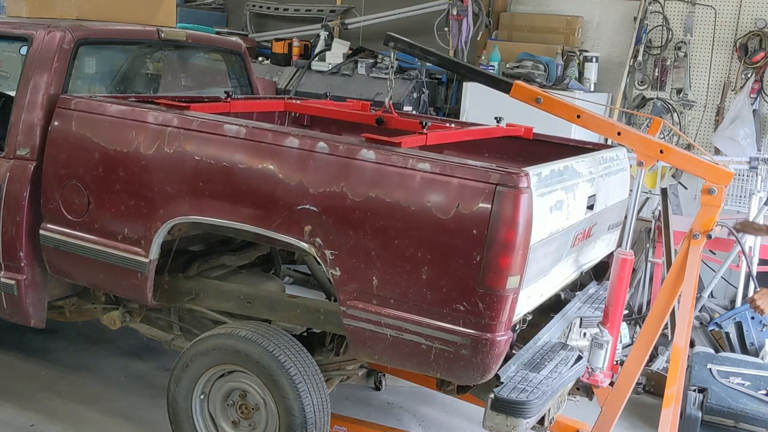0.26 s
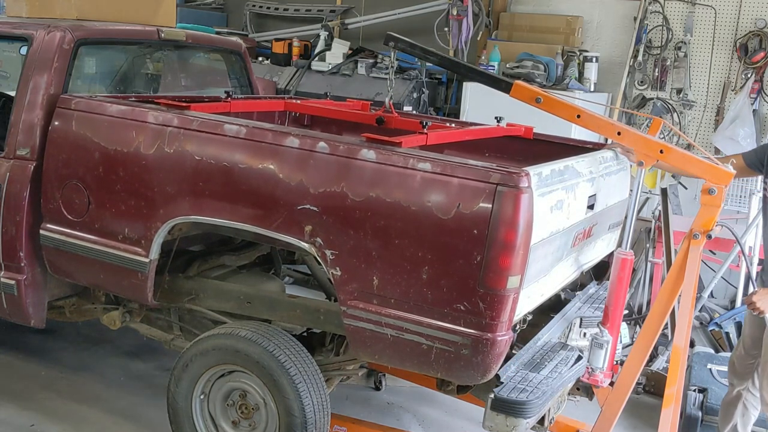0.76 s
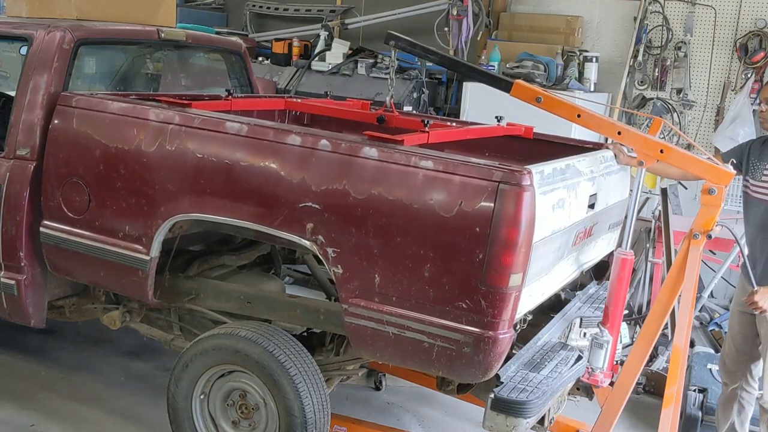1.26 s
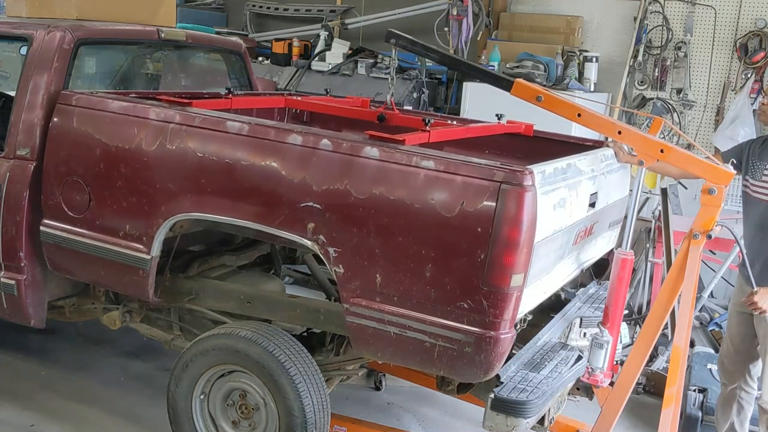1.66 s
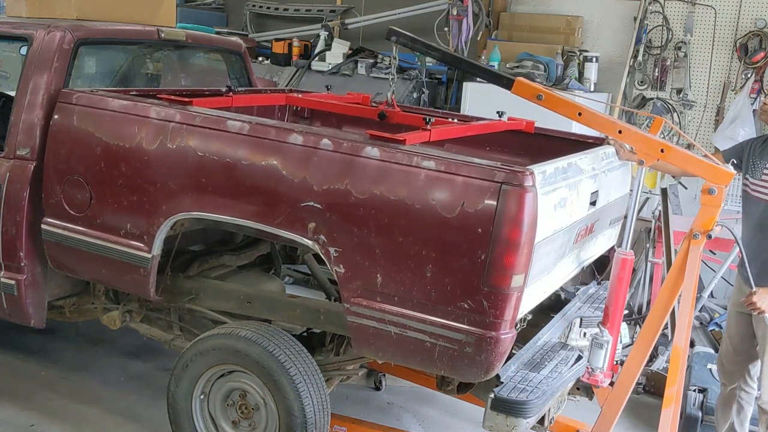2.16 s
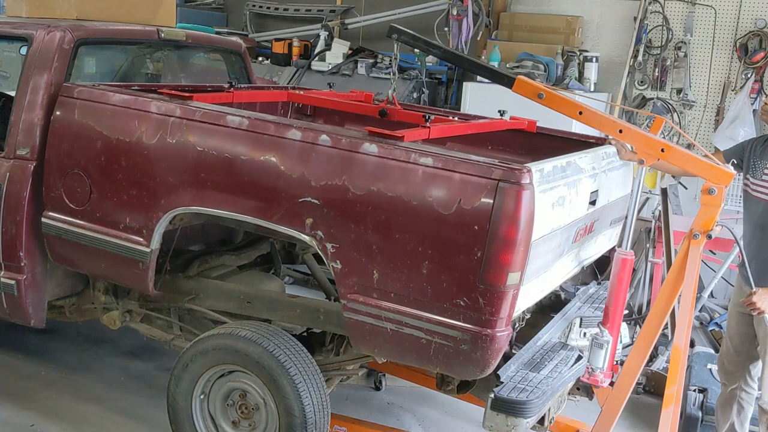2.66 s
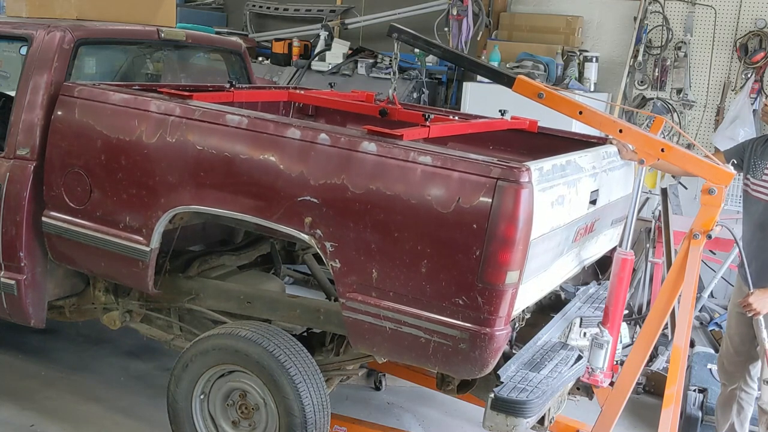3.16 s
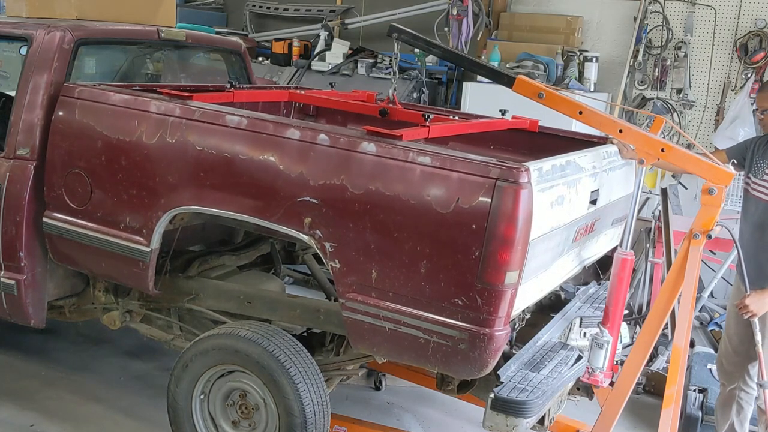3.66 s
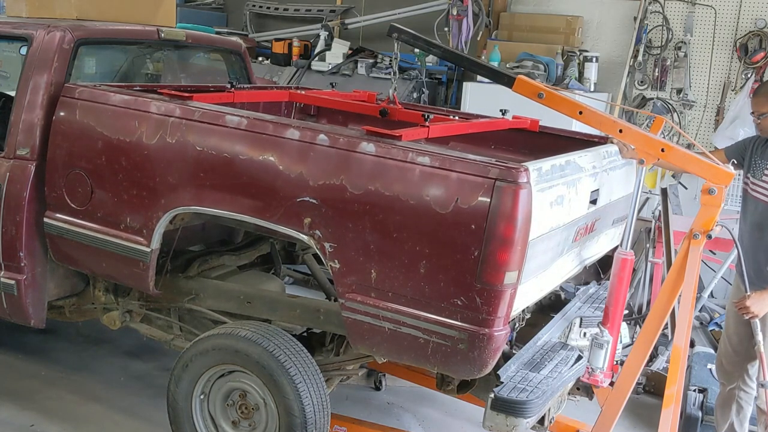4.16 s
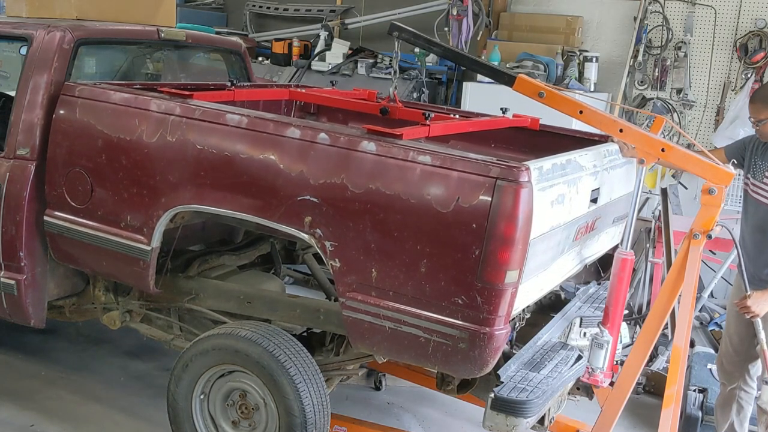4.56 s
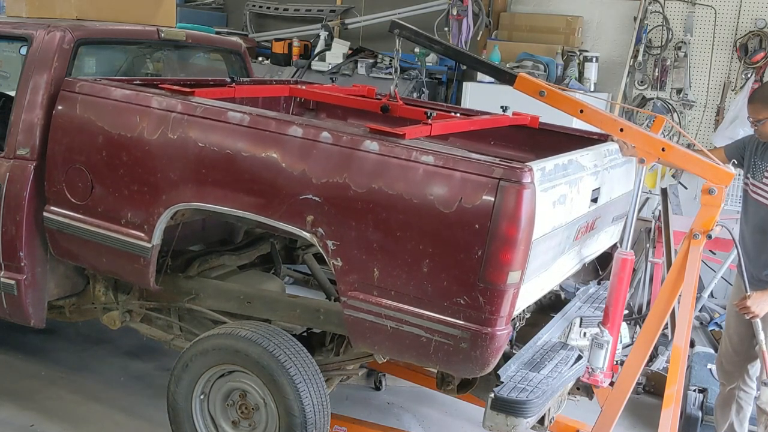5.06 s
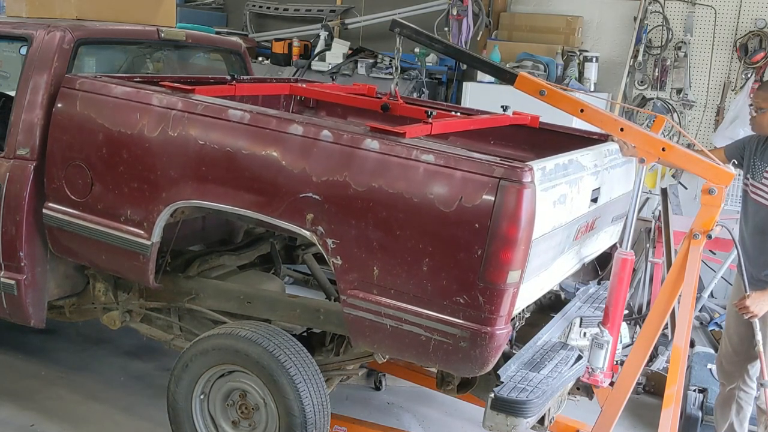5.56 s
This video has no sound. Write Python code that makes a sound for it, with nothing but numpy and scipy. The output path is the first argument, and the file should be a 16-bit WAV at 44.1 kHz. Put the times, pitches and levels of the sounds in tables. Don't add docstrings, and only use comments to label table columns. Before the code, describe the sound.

A garage with a low rumble and a steady, distant compressor hum. Slightly right, an air-driven pump on a hoist opens with a hiss and single strokes at 0.03 and 0.34 s. Each stroke is a harsh, bright spit of air with ringing pump metal and a low frame thump, followed about 28 ms later by a hard, hollow piston knock. After a short rest and rising valve hiss, strokes return at 1.0 and 1.25 s, quickening to a steady eight or so per second until 2.85 s. Reverberation dies away; the frame hums faintly, with tiny leaks and a bright lever click near 3.28 s. A dull, hollow thud sounds across the garage at 3.75 s. A short hiss swells at 4.36 s, then a second rapid run of nine strokes goes from 4.44 to 5.47 s, slowing at the end, leaving echoes, faint settling tones and hum.

```python
import sys
import numpy as np
from scipy import signal
from scipy.fft import rfft, irfft
from scipy.io import wavfile
from scipy.ndimage import uniform_filter1d

SR = 44100
rng = np.random.default_rng(int(sys.argv[2]) if len(sys.argv) > 2 else 0)


def gain_from_db(level_db):
    decades = np.asarray(level_db, float) / 20
    return 10 ** decades


def master_out(mix):
    frames = np.transpose(np.atleast_2d(mix))
    ceiling = np.clip(frames, -1, 1)
    pcm = np.round(ceiling * 32767).astype(np.int16)
    wavfile.write(sys.argv[1], SR, pcm)


N = 255780


def evened(x):
    return x / np.sqrt(np.mean(x ** 2) + 1e-20)


def read(points, hz):
    f, value = np.transpose(points)
    return np.interp(np.log(hz + 1), np.log(f + 1), value)


def coloured(points, shape):
    hz = np.fft.rfftfreq(shape[-1], 1 / SR)
    spectrum = rfft(rng.standard_normal(shape)) * gain_from_db(read(points, hz))
    return evened(irfft(spectrum, shape[-1]))


def clicks(s, db):
    train = np.zeros(N)
    at = np.clip(np.round(s * SR).astype(int), 0, N - 1)
    train[at] = gain_from_db(db)
    return train


def ring(modes, rise_s):
    t = np.arange(SR // 2) / SR
    sines = sum(gain_from_db(db - 60 * t / t60) * np.sin(2 * np.pi * hz * t) for hz, db, t60 in modes)
    return sines * (1 - np.exp(-t / rise_s))


# frequency in Hz, level in dB.
FLOOR = [(18, -53.5), (35, -22.5), (95, -6.5), (145, -10), (210, -27), (260, -32.5), (380, -38.5),
         (650, -44), (1400, -41), (3800, -52), (8000, -57.5), (16000, -54.5)]
FLOOR_DB = -41.5
# frequency in Hz, likeness from -1 to 1.
FLOOR_SAME = [(60, 1), (180, 0.83), (550, 0.77), (1650, 0.085), (4970, 0.28), (15000, -0.27)]
# frequency in Hz, width in Hz, level in dB.
HUM = [(54, 3, -60), (84, 6, -52), (143, 5.4, -48.5), (203.9, 3, -61.5), (7630, 450, -72),
       (13670, 200, -76.5)]


def background():
    hz = np.fft.rfftfreq(N, 1 / SR)
    power = gain_from_db(read(FLOOR, hz)) ** 2
    power *= gain_from_db(FLOOR_DB) ** 2 / power.sum()
    for line_hz, width_hz, db in HUM:
        bump = np.exp(-((hz - line_hz) / width_hz) ** 2)
        power = power + gain_from_db(db) ** 2 * bump / bump.sum()
    same = np.clip(read(FLOOR_SAME, hz), -1, 1)
    a, b = rfft(rng.standard_normal((2, N)))
    left_right = np.array([a, same * a + np.sqrt(1 - same ** 2) * b])
    return irfft(np.sqrt(power * N / 2) * left_right, N)


# frequency in Hz, level in dB rms.
MOTOR = [(53, -50.5), (102, -46), (203.5, -54)]


def motor():
    t = np.arange(N) / SR
    knots = np.linspace(0, t[-1], 40)
    hum = 0
    for hz, db in MOTOR:
        level_drift, phase_drift = [np.interp(t, knots, d) for d in rng.standard_normal((2, 40))]
        tone = np.sin(2 * np.pi * hz * t + .6 * phase_drift)
        hum = hum + np.sqrt(2) * gain_from_db(db + 1.5 * level_drift) * tone
    return hum


# start in seconds, end in seconds, final level in dB.
CREEPS = [
    (0.873, 1.012, -40.5),
    (1.13, 1.255, -34.5),
    (4.358, 4.434, -32),
    (5.74, 5.804, -61),
]
SWELL_DB_PER_S, CREEP_RUSH_DB = 106.5, -7
# start in seconds, level in dB, seconds to fade by 60 dB, lower rush in dB relative to the hiss.
PUFFS = [
    (0.0, -25.5, 0.1, 2.5),
    (.2, -51, 0.52, 0),
    (.284, -48, .3, 1),
    (.5, -65, 1.7, 14),
    (.608, -55.5, 0.44, 8.5),
    (3.1, -63.5, 1.8, 8),
    (3.224, -64, 0.28, -3),
    (5.62, -61.5, .4, 18),
]
# frequency in Hz, level in dB.
LEAK_COLOUR = [(2000, -25), (4000, -2), (5500, -1), (8000, -8.5), (12500, -0.5), (14000, -3), (16000, -13)]
# frequency in Hz, level in dB.
RUSH_COLOUR = [(200, -28), (400, -2), (670, -1), (860, -18), (1070, -5.5), (1400, -10), (2000, -8),
               (2700, -12.5), (4200, -16.5), (6000, -26)]


def leak():
    t = np.arange(N) / SR
    hiss, rush = np.zeros((2, N))
    for start, end, db in CREEPS:
        swell = gain_from_db(db - SWELL_DB_PER_S * abs(end - t)) * (t >= start) * (t < end)
        hiss += swell
        rush += swell * gain_from_db(CREEP_RUSH_DB)
    for start, db, t60, rush_db in PUFFS:
        puff = gain_from_db(db - 60 * abs(t - start) / t60) * (t >= start)
        hiss += puff
        rush += puff * gain_from_db(rush_db)
    hiss, rush = uniform_filter1d(np.array([hiss, rush]), 300)
    return hiss * coloured(LEAK_COLOUR, (N,)) + rush * coloured(RUSH_COLOUR, (N,))


# start in seconds, delay of the knock in ms, heave of the frame in dB.
STROKES = [(0.0332, 26.7, -2), (0.3408, 24.4, -4), (1.0222, 27.8, 2), (1.2542, 28.6, -.5),
           (1.4147, 28.0, -.5), (1.5437, 29.8, 0), (1.6615, 29.3, 3), (1.7789, 29.1, 1.5),
           (1.8963, 29.6, 3.5), (2.0152, 28.8, 2.5), (2.1332, 29.1, 2), (2.2526, 28.3, -2),
           (2.3719, 28.1, 2), (2.4903, 28.2, -.5), (2.6092, 27.9, -1.5), (2.7258, 29.2, 1),
           (2.8446, 28.7, .5), (4.4422, 29.1, 1.5), (4.5562, 29.0, 1), (4.6694, 29.2, 1), (4.7847, 28.8, 2),
           (4.9, 29.6, 1.5), (5.0178, 28.5, 3.5), (5.1413, 27.6, 1.5), (5.297, 26.7, .5),
           (5.4728, 26.9, -2.5)]
BLAST_DB, RESTED_DB, REFILL_S, CARRY = -17, 2.5, 2.16, 0.89


def blast_db():
    s = np.transpose(STROKES)[0]
    refill = 1 - np.exp(-np.diff(s, prepend=s[0]) / REFILL_S)
    return BLAST_DB + RESTED_DB * signal.lfilter([1], [1, -CARRY], refill)


# frequency in Hz, level in dB.
BLAST = [(150, -19), (400, -0.5), (900, -21.5), (1080, 0.5), (1450, -4), (1760, -4), (2150, -8.5),
         (2450, -6), (3200, -7), (4400, -3), (6200, -4), (7400, -7), (12000, -4.5), (15600, -7),
         (16500, -48)]
SNAP_S = .0022
EASE_S, HURRIED_GAP_S = 0.0047, .14


def blast():
    s, db = np.transpose(STROKES)[0], blast_db()
    hurried = np.diff(s, prepend=-1) < HURRIED_GAP_S
    lead_s = .02
    t = np.arange(SR // 4) / SR - lead_s
    spit = gain_from_db(11.5) * np.exp(-((t - .003) / .003) ** 2)
    jet = np.exp(-(np.maximum(t, 0) / 0.032) ** 11.0)
    flow = 0
    for some, open_s, spit_db in (hurried, EASE_S, -1.5), (~hurried, SNAP_S, -.2):
        opening = 1 / (1 + np.exp(-(t - .001) / open_s))
        puff = (gain_from_db(spit_db) * spit + jet) * opening
        flow = flow + signal.oaconvolve(clicks(s[some] - lead_s, db[some] - 1), puff)[:N]
    flutter = gain_from_db(2.0 * evened(uniform_filter1d(rng.standard_normal(N), 60)))
    return flow * flutter * coloured(BLAST, (N,))


# frequency in Hz, level in dB, seconds to fade by 60 dB.
BODY = [(715, -35, 0.48), (1066, -36.5, 0.16), (1063, -27, 0.16), (1149, -33, 0.43), (1196, -37.5, 0.46),
        (1353, -32, 0.13), (1466, -23.5, 0.055), (1570, -45.5, 0.092), (1711, -24, 0.067),
        (1730, -23.5, 0.12), (1867, -37, 0.076), (2268, -36.5, 0.3), (2375, -33.5, 0.2), (2624, -32, 0.3)]


def body():
    s, db = np.transpose(STROKES)[0], blast_db()
    rung = 0
    for mode in BODY:
        late, louder = rng.standard_normal((2, len(s)))
        blows = clicks(s + 0.00297 + .0006 * late, db + 21.0 + 2.4 * louder)
        rung = rung + signal.oaconvolve(blows, ring([mode], 0.00067))[:N]
    return rung


LAND_DB, USUAL_LAG_MS, LAND_DB_PER_MS = -1.04, 28.6, -0.4


def landing_db():
    return LAND_DB + LAND_DB_PER_MS * (np.transpose(STROKES)[1] - USUAL_LAG_MS)


# frequency in Hz, level in dB, seconds to fade by 60 dB.
THUMP = [(83.6, -15, .22)]
# frequency in Hz, level in dB, seconds to fade by 60 dB.
SWING = [(56, -25.5, .27), (64.6, -24.5, .4)]
# frequency in Hz, level in dB, seconds to fade by 60 dB.
BOUNCE = [(135, -19.5, .33), (159, -24.5, .16)]
# frequency in Hz, level in dB.
BOOM = [(40, -37.5), (65, -13), (82, 2), (100, -4.5), (136, -4.5), (165, -0.5), (200, -34)]


def thump():
    (s, lag_ms, db), knock_db = np.transpose(STROKES), landing_db()
    heave_s, ahead_s, rise_s = .003, .0058, .0008
    heave = signal.oaconvolve(clicks(s + heave_s, db), ring(THUMP, rise_s) - ring(SWING, rise_s))
    spring = signal.oaconvolve(clicks(s + lag_ms / 1000 - ahead_s, knock_db), ring(BOUNCE, rise_s))
    t = np.arange(SR // 2) / SR
    linger = gain_from_db(-17 - 60 * t / 0.45) * (1 - np.exp(-(t / 0.054) ** 2))
    power = signal.oaconvolve(clicks(s, db) ** 2, linger ** 2)[:N]
    return (heave + spring)[:N] + np.sqrt(abs(power)) * coloured(BOOM, (N,))


# frequency in Hz, level in dB, seconds to fade by 60 dB.
FRAME = [(203.8, -40.5, 0.69), (239, -30, 0.3), (269.5, -27.5, 0.32), (314.7, -29, 0.3), (356.3, -28, 0.16),
         (447.3, -38, 0.7), (490.5, -31, 0.37), (554, -38.5, 0.68), (637, -55.5, 1.37), (683, -38, 0.72),
         (767, -36, 0.56), (895, -86.5, 0.21)]
# delay in ms, share of the knock.
ECHOES = [(5.7, 0.36), (10.5, 0.62), (18.5, 0.43), (22.4, 0.1), (28, 0.18), (38, 0.15), (47.5, 0.062),
          (52.3, 0.23), (59.3, 0.29)]
KNOCK_HZ, KNOCK_DB, KNOCK_MS = 565, -13, 1.75


def knock():
    (s, lag_ms, _), db = np.transpose(STROKES), landing_db()
    ms = np.arange(SR // 2) * 1000 / SR
    bursts = 0
    for delay_ms, share in [(0.014, 0.94)] + ECHOES:
        u = ms - delay_ms - 2
        cycles = np.cos(2 * np.pi * KNOCK_HZ * u / 1000) * np.exp(-(u / KNOCK_MS) ** 2 / 2)
        bursts = bursts - share * cycles
    blow = gain_from_db(KNOCK_DB) * bursts + ring(FRAME, 0.0016)
    return signal.oaconvolve(clicks(s + lag_ms / 1000, db), blow)[:N]


# start in seconds, frequency in Hz, level in dB, length in seconds.
SETTLING = [(.48, 711, -55, 0.24), (.55, 80, -42, .46), (4.16, 84, -40, .27), (2.963, 328, -48.5, 0.23),
            (3.013, 100, -21, 0.036), (3.05, 895, -66, 0.24), (3.06, 634, -53, 0.17),
            (3.11, 484, -57, 0.15), (3.25, 640, -65, 0.24), (3.512, 327, -57.5, 0.28),
            (3.852, 275.4, -49.5, 0.14), (5.6, 690, -51, 0.18)]


def settling():
    t = np.arange(N) / SR
    tones = 0
    for s, hz, db, length_s in SETTLING:
        swell = np.sin(np.pi * np.clip((t - s) / length_s, 0, 1)) ** 0.51
        tones = tones + gain_from_db(db) * np.sin(2 * np.pi * hz * t) * swell
    return tones


# time in seconds, level in dB.
TICKS = [
    (.612, -47),
    (3.182, -59),
    (3.226, -52),
    (3.274, -44),
    (3.279, -31),
]


def ticks():
    s, db = np.transpose(TICKS)
    fade = np.exp(-np.arange(400) / SR / 0.0017)
    bright = evened(np.gradient(coloured(LEAK_COLOUR, (N,))))
    return signal.oaconvolve(clicks(s, db), fade)[:N] * bright


# start in seconds, level in dB, length in seconds.
THUD = (3.746, -34, 0.0072)
# frequency in Hz, level in dB.
THUD_COLOUR = [(120, -31.5), (200, -7.5), (488, -7), (839, -15), (1310, -11), (1420, -11), (3300, -32),
               (3930, -38), (9000, -47), (11700, -74), (19800, -120)]
# frequency in Hz, level in dB, seconds to fade by 60 dB.
THUD_MODES = [(307, -41, 0.72), (366, -50, 0.4), (503, -43, 0.24), (740, -47, 0.46), (1250, -46, .3),
              (1580, -62, .2)]


def thud():
    s, db, length_s = THUD
    t = np.maximum(np.arange(N) / SR - s, 0)
    puff = gain_from_db(db) * (t > 0) * np.exp(-t / length_s) * coloured(THUD_COLOUR, (N,))
    hollow = signal.oaconvolve(clicks(np.array([s]), 0), ring(THUD_MODES, 0.0037))[:N]
    return puff, hollow


def floor_dip(x):
    dip_hz, width_hz, share = 890, 200, .75
    b, a = signal.iirpeak(dip_hz, dip_hz / width_hz, SR)
    return x - share * signal.lfilter(b, a, x)


# frequency in Hz, left minus right in dB.
BALANCE_DB = [(60, -2.5), (180, 0), (550, -2), (1650, -4.5), (4970, 6.5), (15000, -19)]
LEFT_LAG = 5


def placed(x):
    hz = np.fft.rfftfreq(N, 1 / SR)
    half = gain_from_db(read(BALANCE_DB, hz) / 2)
    later = np.exp(-2j * np.pi * hz * LEFT_LAG / SR)
    return irfft(rfft(x) * np.array([half * later, 1 / half]), N)


def scattered(x, count=40, span_s=.007):
    taps = np.zeros((2, SR // 50))
    at = rng.uniform(.05, 1, (2, count)) * span_s
    bounces = rng.choice([-1., 1.], at.shape) * np.exp(-at / 0.004)
    np.put_along_axis(taps, (at * SR).astype(int), bounces, 1)
    taps /= np.linalg.norm(taps, axis=1)[:, None]
    treble = signal.sosfilt(signal.butter(2, 1900, "high", fs=SR, output="sos"), x)
    return signal.oaconvolve(treble[None], taps, axes=1)[:, :N]


# frequency in Hz, seconds to fade by 60 dB.
AIR_T60 = [(300, 0.52), (1000, 0.24), (2700, 0.36), (5000, 0.31), (9000, 0.3), (15000, 0.26)]


def diffuse(x, gap_s=.006):
    hz, t, z = signal.stft(x, SR, nperseg=256, noverlap=192)
    keep = gain_from_db(-120 * t[1] / read(AIR_T60, hz))
    fed = uniform_filter1d(abs(z) ** 2, 3, 0)
    power = np.array([signal.lfilter([1 - k], [1, -k], p) for k, p in zip(keep, fed)])
    a, b = rng.standard_normal((2, 2) + power.shape)
    tail = signal.istft(np.sqrt(2 * power) * (a + 1j * b), SR, nperseg=256, noverlap=192)[1]
    return np.pad(tail, ((0, 0), (int(gap_s * SR), 0)))[:, :N]


# frequency in Hz, seconds to fade by 60 dB.
GARAGE = [(200, 0.54), (700, 0.42), (2000, 0.27), (6000, .35)]


def garage(x, gap_s=0.004026):
    taps = np.zeros((2, SR))
    at = np.arange(int(gap_s * SR), SR - 20, 20)
    at = at + rng.integers(0, 20, (2, len(at)))
    np.put_along_axis(taps, at, rng.choice([-1., 1.], at.shape), 1)
    hz, t, z = signal.stft(taps, SR, nperseg=256)
    fade = gain_from_db(-60 * t / read(GARAGE, hz)[:, None])
    tail = signal.istft(z * fade, SR, nperseg=256)[1]
    return signal.fftconvolve(x[None], tail / np.linalg.norm(tail[0]), axes=1)[:, :N]


def scene():
    air = floor_dip(blast() + body())
    seep = leak() + ticks()
    steel = floor_dip(thump() + knock())
    far, hollow = thud()
    above_bass = signal.sosfilt(signal.butter(2, 400, "high", fs=SR, output="sos"), steel)
    direct = placed(gain_from_db(-4.7) * air + gain_from_db(-8.7) * seep + steel + settling())
    direct = direct + gain_from_db(-4) * far + hollow
    early = scattered(gain_from_db(-4.3) * air + gain_from_db(-5.5) * seep) * gain_from_db([[-1.5], [1.5]])
    air_tail = diffuse(gain_from_db(-2.5) * air + gain_from_db(-3.5) * seep)
    knock_tail = garage(gain_from_db(-14.0) * above_bass + gain_from_db(9.5) * far)
    return direct + early + air_tail + knock_tail + background() + motor()


def band_limit(x):
    return signal.sosfilt(signal.butter(12, 16820, fs=SR, output="sos"), x)


def record(dry):
    thin = signal.sosfilt(signal.butter(4, 42, "high", fs=SR, output="sos"), dry)
    limited = thin / (1 + (thin / .84) ** 4) ** .25
    edge = signal.firwin(601, 15900, window=("kaiser", 5), fs=SR)
    mix = signal.oaconvolve(limited, edge[None], "same", axes=1)
    return band_limit(mix)


dry = scene()
out = record(dry)
master_out(out)
```